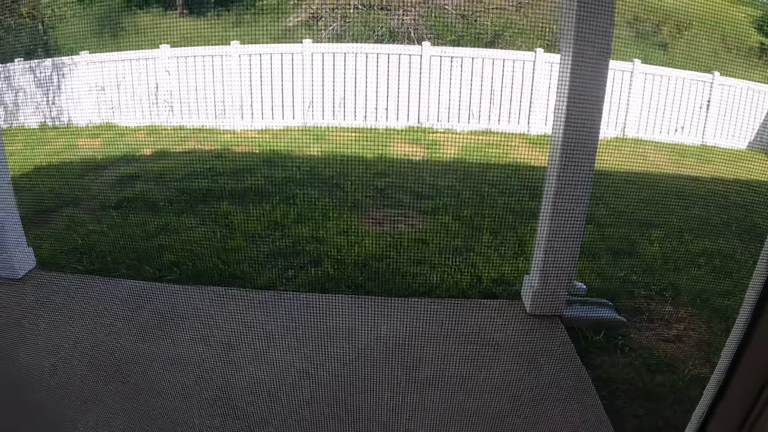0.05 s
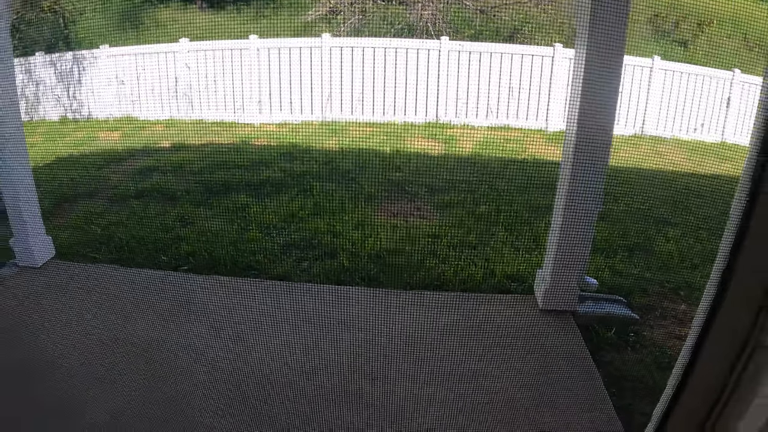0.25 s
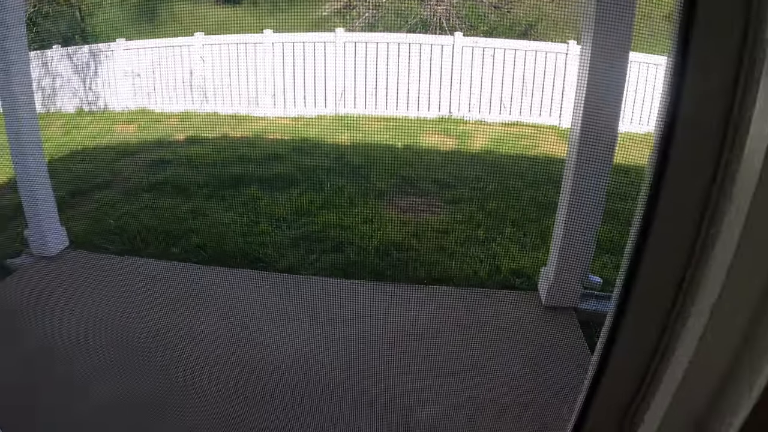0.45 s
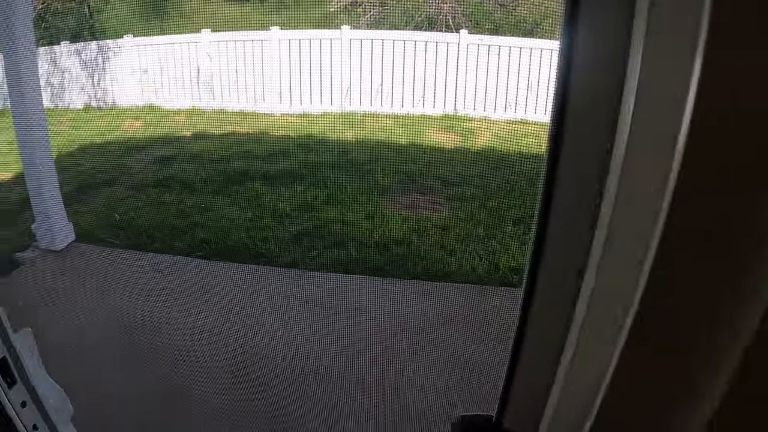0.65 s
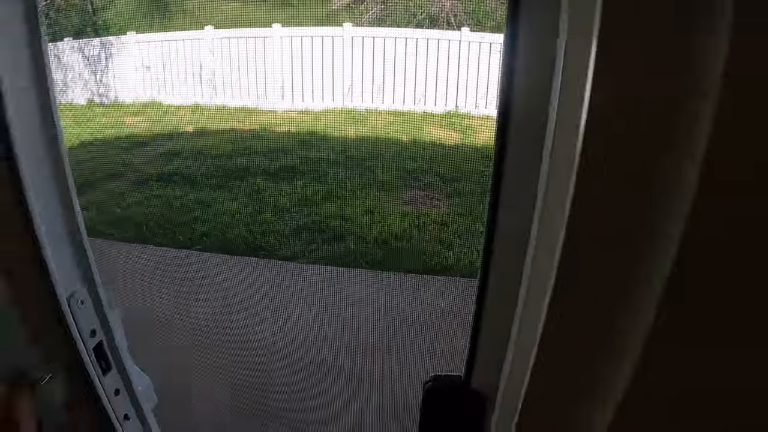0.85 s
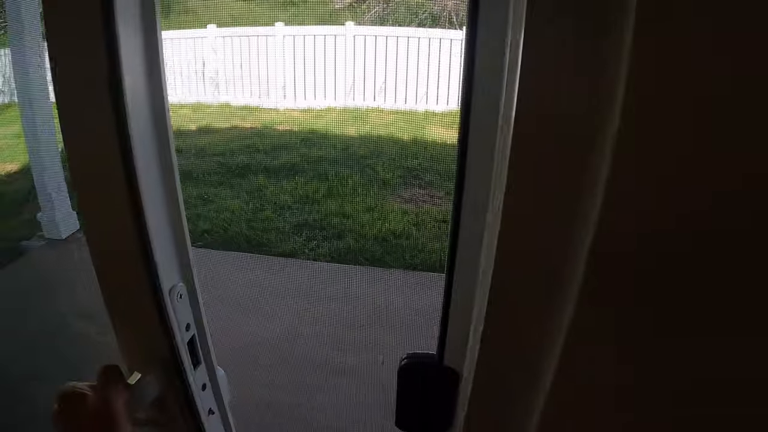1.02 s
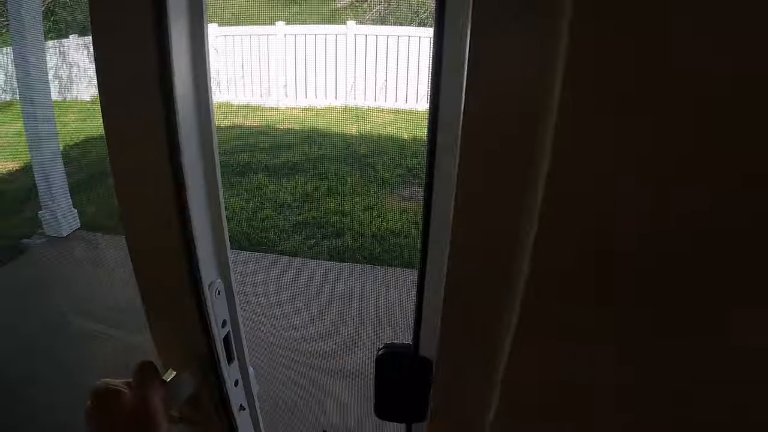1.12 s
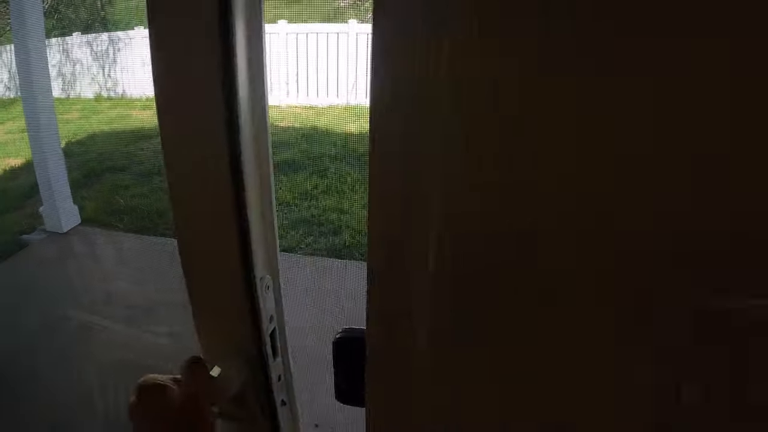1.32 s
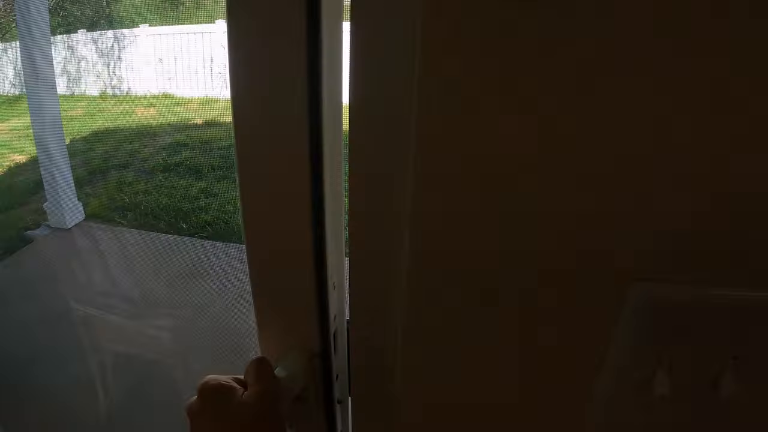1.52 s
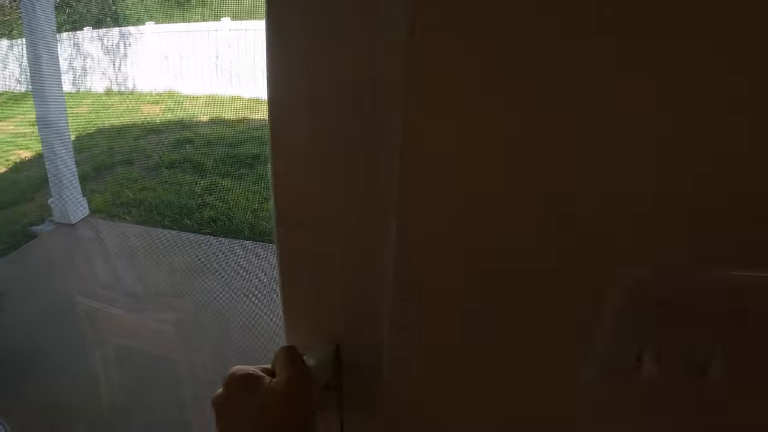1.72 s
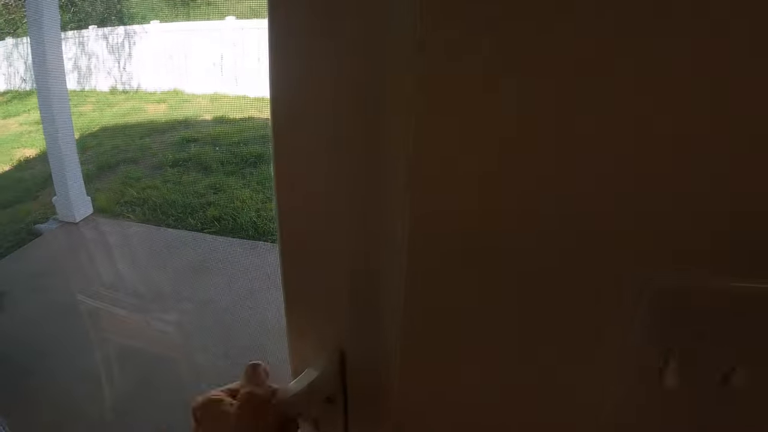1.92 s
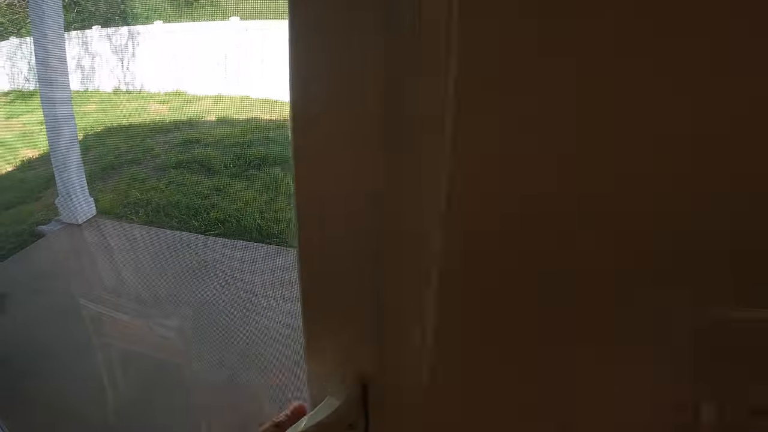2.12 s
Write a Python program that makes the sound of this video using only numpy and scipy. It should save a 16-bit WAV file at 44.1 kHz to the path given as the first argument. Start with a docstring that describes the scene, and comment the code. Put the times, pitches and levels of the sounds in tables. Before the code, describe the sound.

Close to the microphone in a room, a heavy sliding glass door rumbles along with a faint whine and light metal ticks. It slams shut with a deep thud and clattering latch, and the glass rattles briefly.

```python
"""A low rolling rush with grit, a hum and a rising whine: a heavy glazed door runs along its track in a house.
Metal parts tick; the door slows, meets the seal and slams into the jamb in a quick series of contacts.
Each contact excites the damped modes of panel, wall and floor and crunches the latch. Seal and latch
squeak, frame and glass shudder on, and the room reverberates around a close microphone."""
import sys
import numpy as np
from scipy import signal
from scipy.fft import rfft, irfft, next_fast_len
from scipy.io import wavfile
from scipy.ndimage import uniform_filter1d, map_coordinates

SR = 44100
rng = np.random.default_rng(int(sys.argv[2]) if len(sys.argv) > 2 else 0)


def generate_wav(sig):
    """Save sig (samples, or channels by samples) to the path in sys.argv[1] as 16-bit PCM at SR."""
    pcm = np.round(np.clip(np.atleast_2d(sig).T, -1, 1) * 32767).astype(np.int16)
    wavfile.write(sys.argv[1], SR, pcm)


N = 95256
T = np.arange(N) / SR

# Contacts with the jamb: t/s, level/dB of floor, wall, panel and latch, latch cutoff f/Hz, latch t60/s
CONTACTS = [(1.656, -42, -40, -16.5, -38, 1997, .03), (1.668, -37, -23, -14.5, -29, 2516, 0.016),
            (1.684, -38, -11, -13, -36, 2500, .03), (1.6993, -30, -26, -28, 0, 6000, 0.015),
            (1.706, -6, -13.5, -23.5, -2, 3120, 0.025), (1.7108, -20, -23, -15.5, -7, 2020, 0.016),
            (1.724, -32, -27, -41, -16.5, 3000, 0.013), (1.746, -32, -26, -25, -20.5, 2500, 0.039),
            (1.762, -18, -13.5, -17.5, -18.5, 9000, 0.023), (1.7986, -30, -28, -23, -3, 1490, 0.022),
            (1.844, -20, -24, -27, -35, 1500, 0.033)]


def amp(db):
    """Amplitude ratio of a level in decibels."""
    return 10 ** (np.asarray(db) / 20)


def unit(x):
    """Normalisation to an rms of 1."""
    return x / np.sqrt(np.mean(x ** 2) + 1e-20)


def along(points, hz):
    """Interpolation of (f/Hz, value) points on a logarithmic frequency axis."""
    f, v = np.transpose(points)
    return np.interp(np.log(hz + 1), np.log(f + 1), v)


def curves(rows):
    """Linear interpolation of each column in time, and a gate open over the table's span."""
    s, *cols = np.transpose(rows)
    gate = uniform_filter1d(1. * (T <= s[-1]) * (T >= s[0]), size=400)
    return [np.interp(T, s, c) for c in cols] + [gate]


def wobble(rate):
    """Random modulation: a spline through `rate` Gaussian knots a second."""
    return map_coordinates(rng.standard_normal(int(N * rate / SR) + 4), [T * rate])


def filtered(x, response):
    """Linear filtering: the spectrum of x times a frequency response."""
    m = next_fast_len(N + SR // 2)
    return irfft(rfft(x, m) * response(np.fft.rfftfreq(m, 1 / SR)), m)[..., :N]


def rush(spectrum, patchy_db):
    """Partially coherent stereo noise of rms 1, its gain varying in time-frequency patches."""
    coherence = [(150, 0.97), (300, 1), (550, 0.83), (1650, 0.76), (5000, 0.72), (15000, 0.41)]  # likeness of left and right: f/Hz, correlation
    balance = [(150, -0.5), (400, 1.5), (950, 3), (3770, 2), (15000, 4)]  # left over right: f/Hz, level/dB
    z = signal.stft(rng.standard_normal((2, N)), nperseg=512)[2]
    patches = uniform_filter1d(rng.standard_normal(z.shape[1:]), size=6, axis=0)
    patches = uniform_filter1d(patches, size=10, axis=1)
    pair = signal.istft(z * amp(patchy_db * unit(patches)), nperseg=512)[1][:, :N]
    angle = lambda hz: np.arccos(np.clip(along(coherence, hz), -1, 1)) / 2
    mid, side = filtered(pair, lambda f: amp(along(spectrum, f)) * [np.cos(angle(f)), np.sin(angle(f))])
    stereo = np.array([mid + side, mid - side])
    return unit(filtered(stereo, lambda f: amp(np.outer([.5, -.5], along(balance, f)))))


def ring(s, db, modes, attack_s, scatter_db):
    """Free vibration: modes struck at time s decay exponentially."""
    start = round(s * SR)
    elapsed = np.maximum(T - s, 0)[start:]
    out = np.zeros(N)
    for hz, level, t60 in modes:
        t = elapsed[:int(min(t60, 1) * SR)]
        decay = amp(db + level + scatter_db * rng.normal() - 60 * t / t60)
        out[start:][:len(t)] += decay * np.sin(2 * np.pi * hz * t) * (1 - np.exp(-t / attack_s))
    return out


def rolling():
    """Rolling noise: rollers on the track excite a rush, grit, a drone and a rising whine."""
    travel = [(0, -44.5, -7, -61), (.1, -46, -2.5, -48), (.25, -41, -1.5, -33.5), (.4, -34.5, -5.5, -41),
              (.55, -36, -1.5, -50), (.72, -35.5, -2, -37.5), (.88, -34, -2.5, -29.5), (1.03, -36, -4, -36),
              (1.09, -34.5, -6, -30), (1.24, -37, -6.5, -38.5), (1.4, -40.5, -5.5, -35.5),
              (1.53, -44.5, -4, -38.5), (1.58, -44.5, -28, -32.5), (1.66, -40, -23, -46)]  # envelopes: t/s, relative level/dB of rush, grit against rush, drone
    track_spectrum = [(53, -3), (90, -11), (140, -1), (167, -16), (199, -4), (248, -9.5), (459, -7.5),
                      (801, -11.5), (3000, -27), (3900, -96), (6600, -120)]  # rush of the track: f/Hz, density level/dB
    grit_spectrum = [(880, -7), (1500, 0), (2240, -3), (3650, -9.5), (4990, -12.5), (12100, -27),
                     (15500, -31)]  # gritty treble: f/Hz, density level/dB
    drone_spectrum = [(100, -25), (140, 5.5), (220, -6), (300, 3.5), (400, -15), (600, -44.5)]  # low drone: f/Hz, density level/dB
    glide = [(.38, 1855, -60), (.45, 2050, -44), (.5, 2150, -42), (.535, 2230, -38), (.555, 2500, -39),
             (.6, 2600, -42), (.65, 2820, -44.5), (.73, 3050, -44), (.78, 3100, -58)]  # roller whine: t/s, f/Hz, level/dB
    level_db, treble_db, drone_db, gate = curves(travel)
    body = amp(level_db + 4 + .6 * wobble(16.5)) * rush(track_spectrum, patchy_db=1.1)
    grit = amp(level_db + treble_db + .3 * wobble(20.5)) * rush(grit_spectrum, patchy_db=1.2)
    drone = amp(drone_db - 2) * rush(drone_spectrum, patchy_db=0)
    hz, whine_db, whine_gate = curves(glide)
    spread_hz, overtone_ratio = 170, 2.25
    phase = 2 * np.pi * np.cumsum(hz + spread_hz * wobble(300)) / SR
    partials = np.sin(phase) + amp(-10.5) * np.sin(overtone_ratio * phase)
    whine = whine_gate * amp(whine_db + 2.8 * wobble(40.6)) * partials
    return gate * (body + grit + drone + whine)


def panel_hum():
    """Forced vibration: the panel's strongest mode, driven by the rollers and then by the slam."""
    mode = [(0, 202.6, -43.5), (.25, 180, -44.5), (.32, 182.6, -32), (.46, 178.2, -30), (.54, 186, -46.5),
            (.8, 192, -45), (.87, 195.3, -29.5), (1, 191.9, -39.5), (1.04, 197.6, -26),
            (1.12, 197.6, -31.5), (1.18, 196.7, -39), (1.24, 191.7, -29), (1.3, 194.5, -44),
            (1.48, 192, -39), (1.56, 195.6, -29), (1.64, 197.1, -36), (1.78, 195.4, -25.5),
            (1.84, 197.5, -21.5), (1.95, 194, -30.5), (2.05, 194.8, -37), (2.16, 187, -52)]  # course of the hum: t/s, f/Hz, relative level/dB
    waver_db, waver_hz = 2, 6.5
    hz, db, _ = curves(mode)
    envelope = amp(db + .5 + waver_db * wobble(35.16))
    return envelope * np.sin(2 * np.pi * np.cumsum(hz + waver_hz * wobble(40)) / SR)


def background():
    """Background noise: a low rumble of the floor that swells at the slam, and a faint hiss."""
    rumble_spectrum = [(18, -12.5), (35, 0.5), (50, -2), (75, -7), (120, -10), (200, -18)]  # floor rumble: f/Hz, density level/dB
    swell = [(0, -38), (.25, -38), (.73, -43), (.85, -43), (1.25, -39.5), (1.49, -41.5), (1.66, -40),
             (1.9, -29.5), (2.16, -35.5)]  # its envelope: t/s, relative level/dB
    hiss_spectrum = [(200, 1), (500, -24), (1000, -6.5), (2000, -21.5), (5000, -19.5), (10000, -29),
                     (11900, -33), (12800, -29.5), (15500, -48)]  # faint hiss with a thin band near 12.8 kHz: f/Hz, density level/dB
    rumble = filtered(rng.standard_normal(N), lambda f: amp(along(rumble_spectrum + [(400, -120)], f)))
    hiss = amp(-42.5) * rush(hiss_spectrum, patchy_db=1.5)
    return amp(curves(swell)[0] + 4.5) * unit(rumble) + hiss


def ticks():
    """Impact excitation: small metal parts ring briefly, a high tick over a lower knock."""
    strikes = [(.612, -31.5, -20), (1.1812, -24.5, 2), (1.534, -32, -18), (1.6538, -18.5, -8.5)]  # impacts: t/s, relative level/dB, knock offset/dB
    tick_modes = [(4960, -1.5, 0.0082), (6680, -1, 0.011), (7270, 1, 0.006), (10490, -12.5, 0.0074)]  # high metal modes: f/Hz, level/dB, t60/s
    knock_modes = [(1130, 2.5, 0.0093), (1870, 2.5, 0.013), (2580, -4, .01), (3680, -4, 0.014)]  # lower modes: f/Hz, level/dB, t60/s
    return sum(ring(s, db - 4, tick_modes, attack_s=.00026, scatter_db=1.5)
               + ring(s, db + knock_db, knock_modes, attack_s=.00031, scatter_db=0)
               for s, db, knock_db in strikes)


def shudder():
    """Decaying random vibration: frame and glass shake on after the slam."""
    shaking = [(1.645, -50, -4), (1.665, -38.5, 4.5), (1.69, -30.5, 4.5), (1.72, -26, -5),
               (1.76, -30.5, 1.5), (1.82, -33.5, -2.5), (1.9, -37.5, -2), (1.97, -42.5, -1),
               (2.05, -45.5, -1), (2.16, -51, -5)]  # envelopes: t/s, relative level/dB, fizz offset/dB
    frame_spectrum = [(150, -23), (250, 5.5), (360, -3), (399, -2), (624, -10), (936, -5.5), (3000, -22),
                      (3900, -37), (6600, -120)]  # shaking frame: f/Hz, density level/dB
    fizz_spectrum = [(1180, -5), (2000, -3.5), (3020, -10.5), (4480, -7), (5990, -12), (8440, -10.5),
                     (9590, -25.5), (12500, -26), (13500, -35), (15500, -36)]  # treble of the rattle: f/Hz, density level/dB
    level_db, treble_db, gate = curves(shaking)
    frame = amp(level_db + 6 + 1.6 * wobble(40.29)) * rush(frame_spectrum, patchy_db=0)
    fizz = amp(level_db + treble_db + 1.2 * wobble(50.7)) * rush(fizz_spectrum, patchy_db=2.5)
    return gate * (frame + fizz)


def thud():
    """Modal superposition: each contact with the jamb booms in floor and wall and rings the panel."""
    floor_modes = [(33.6, -1.5, .5)]  # deep boom of the floor: f/Hz, level/dB, t60/s
    wall_modes = [(49.8, 3.5, 0.24), (59.6, 1.5, 0.58), (79.4, 1.5, 0.3113)]  # boom of the wall: f/Hz, level/dB, t60/s
    panel_modes = [(99.6, 5, 0.21), (125.4, 0, 0.24), (143.2, -4, 0.37), (240, -29, 0.21), (285, -21, 0.63),
                   (332, -21.5, 0.19), (400.2, -16.5, 0.74), (515.8, -20.5, 0.47)]  # ring of the panel: f/Hz, level/dB, t60/s
    return sum(ring(s, floor_db, floor_modes, attack_s=.007, scatter_db=1.5)
               + ring(s, wall_db, wall_modes, attack_s=.007, scatter_db=.5)
               + ring(s, panel_db, panel_modes, attack_s=.003, scatter_db=4)
               for s, floor_db, wall_db, panel_db, *_ in CONTACTS)


def latch_crunch():
    """Source and filter: each contact sends a snap and a dying noise through the latch's resonances."""
    resonances = [(670, 230, 0.5), (1083, 250, 6), (1510, 340, 3.5), (1900, 360, 6), (2690, 210, 4.5),
                  (3860, 830, 1.5), (5060, 1200, -1.5), (6860, 1200, 0.5)]  # latch modes: f/Hz, bandwidth/Hz, level/dB
    rise_s, snap_gain = .0004, 5

    def response(f):
        return sum((-1) ** k * amp(db) * 1j * f * width / (hz * hz - f * f + 1j * f * width)
                   for k, (hz, width, db) in enumerate(resonances))

    out = np.zeros(N)
    for s, *_, db, cutoff_hz, t60 in CONTACTS:
        t = np.maximum(T - s, 0)
        burst = amp(db - 60 * t / t60) * (1 - np.exp(-t / rise_s)) * rng.standard_normal(N)
        burst[round(s * SR)] = snap_gain * amp(db)
        out += filtered(burst, lambda f: response(f) / (1 + 1j * f / cutoff_hz) ** 2)
    return out


def squeaks():
    """Amplitude and phase modulation: seal and latch squeak briefly during and after the slam."""
    whistles = [(1.676, 11550, -27.5, 0.0064, 0.0038, 0), (1.676, 12500, -34, .006, .004, 0),
                (1.689, 12400, -40, .003, .003, 2), (1.6985, 8450, -13, 0.0015, .003, 2),
                (1.704, 8740, -21.5, 0.0014, 0.008, 5), (2.012, 6800, -38.5, 0.009, 0.0021, 2),
                (2.022, 6790, -30, 0.0033, 0.0053, 2), (2.021, 7230, -42, .004, .004, 0),
                (2.043, 7300, -48, .008, 0.0095, 7), (2.102, 7200, -43.5, 0.0026, .004, 2)]  # squeaks: peak t/s, f/Hz, level/dB, rise/s, fall/s, left over right/dB
    flutter, roughness_rad, left_lead_s = .15, .7, 1.2e-5
    stereo_t = T + np.array([[left_lead_s], [0]])
    out = np.zeros((2, N))
    for s, hz, db, rise, fall, lean_db in whistles:
        pulse = np.exp(-((T - s) / np.where(T < s, rise, fall)) ** 2)
        envelope = amp(db) * pulse * (1 + flutter * wobble(350))
        tone = np.sin(2 * np.pi * hz * stereo_t + roughness_rad * wobble(600))
        out += envelope * tone * amp([[lean_db / 2], [-lean_db / 2]])
    return out


def room(x):
    """Reverberation: convolution with a noise tail in which each frequency decays at its own rate."""
    decay_times = [(100, 0.52), (1000, 0.75), (6000, 0.86), (13000, 0.6)]  # reverberation time: f/Hz, t60/s
    hz, t, z = signal.stft(rng.standard_normal((2, SR // 2)), SR, nperseg=256)
    tail = signal.istft(z * amp(-60 * t / along(decay_times, hz)[:, None]), SR, nperseg=256)[1]
    delayed = np.pad(x, (300, 0))[None]
    return signal.fftconvolve(delayed, tail / np.linalg.norm(tail[0]), axes=1)[:, :N]


def scene():
    """Superposition of all sources; only the metal and the squeaks reverberate."""
    metal = ticks() + latch_crunch()
    whistles = squeaks()
    direct = metal * amp([[.4], [-.4]]) + whistles  # metal slightly to the left
    reverb = amp(-7) * room(metal + amp(-12) * whistles.mean(axis=0))  # close squeaks reach it weakly
    return direct + reverb + thud() + panel_hum() + shudder() + rolling() + background()


def record(dry):
    """Attenuation and saturation: a brief dip above the bass, soft clipping, a dull, limited top."""
    dip_s, dip_width_s, dip_db = 1.987, .006, -10
    shelf_hz, shelf_db, top_hz = 13200, -10, 15980
    bass = filtered(dry, lambda f: 1 / (1 + (f / 250) ** 4))
    dipped = bass + (dry - bass) * amp(dip_db * np.exp(-((T - dip_s) / dip_width_s) ** 2))
    clipped = dipped / (1 + np.abs(dipped) ** 12) ** (1 / 12)
    microphone = lambda f: amp(shelf_db / (1 + np.exp((shelf_hz - f) / 200)))
    return filtered(clipped, lambda f: (f < top_hz) * (f > 8) * microphone(f))


dry = scene()
out = record(dry)
generate_wav(out)
```